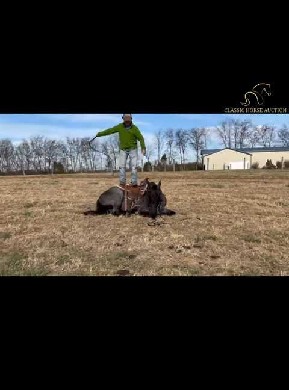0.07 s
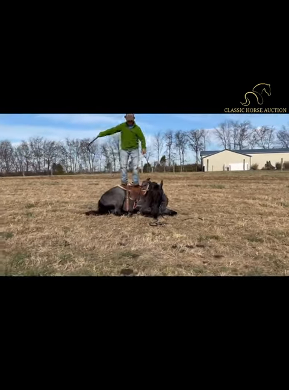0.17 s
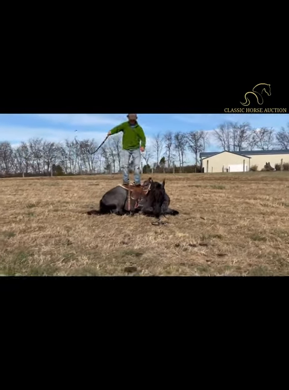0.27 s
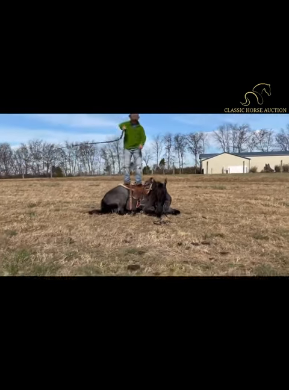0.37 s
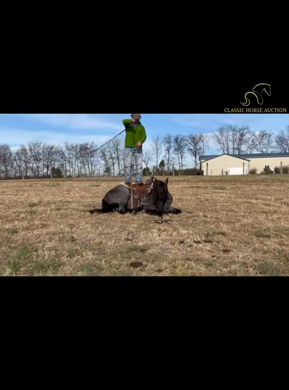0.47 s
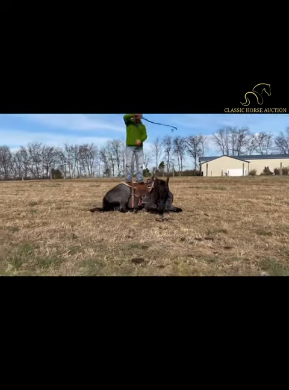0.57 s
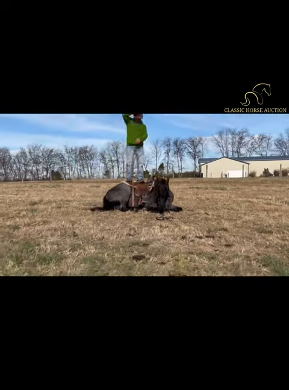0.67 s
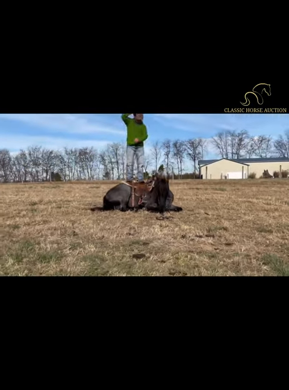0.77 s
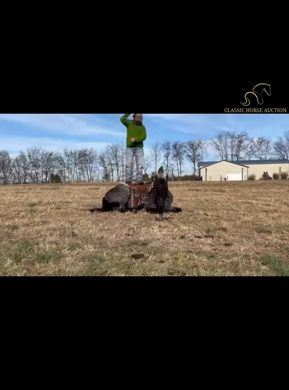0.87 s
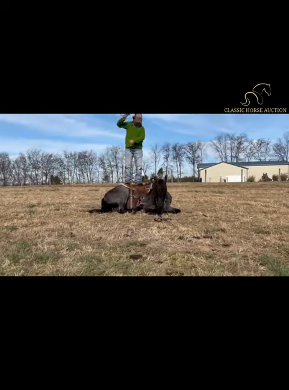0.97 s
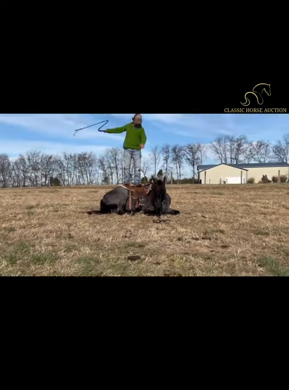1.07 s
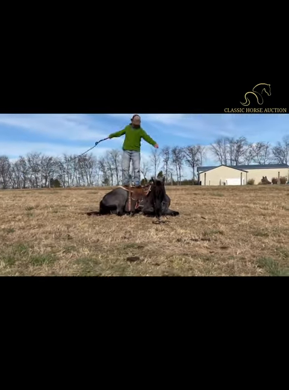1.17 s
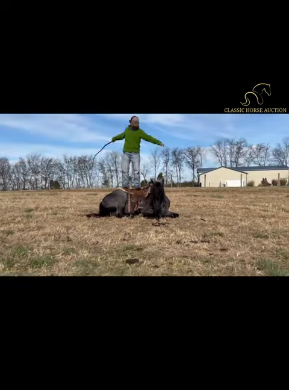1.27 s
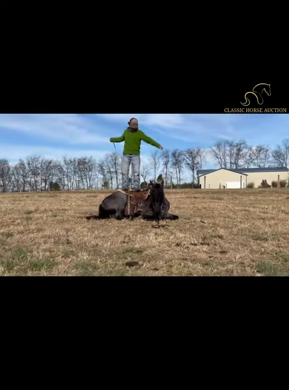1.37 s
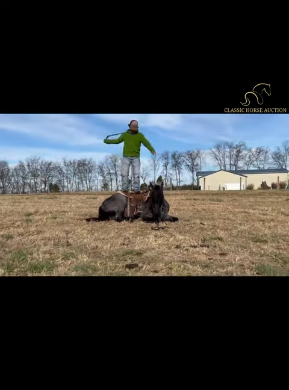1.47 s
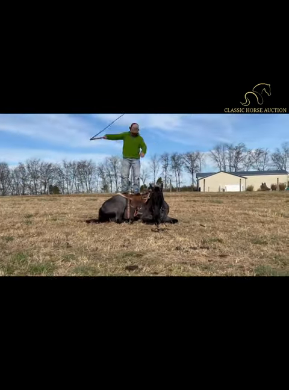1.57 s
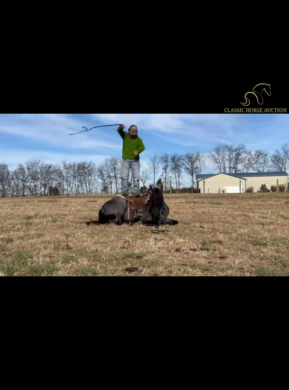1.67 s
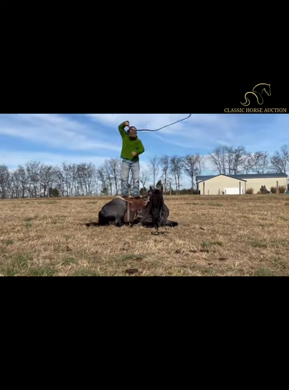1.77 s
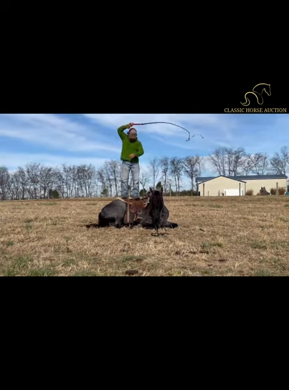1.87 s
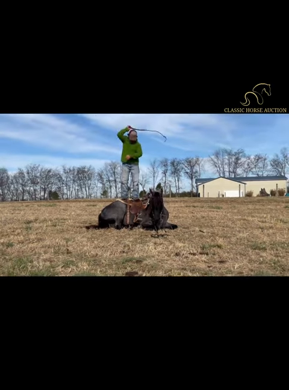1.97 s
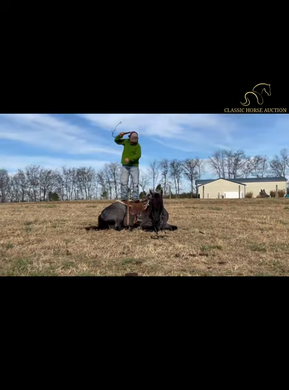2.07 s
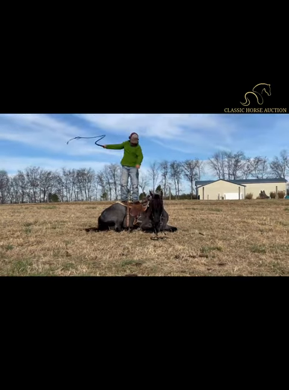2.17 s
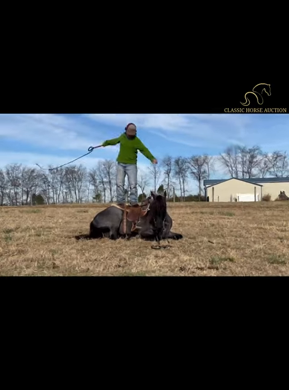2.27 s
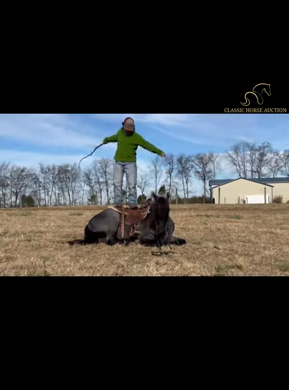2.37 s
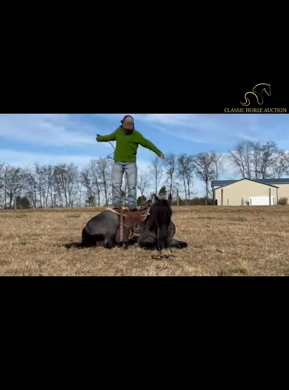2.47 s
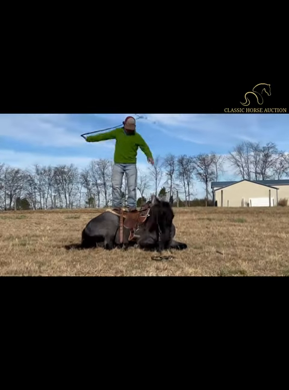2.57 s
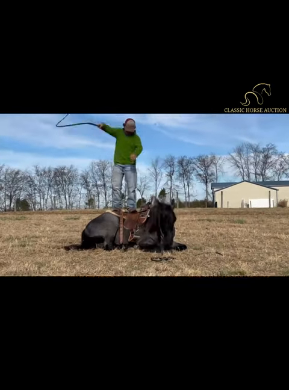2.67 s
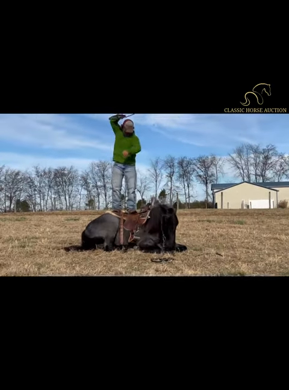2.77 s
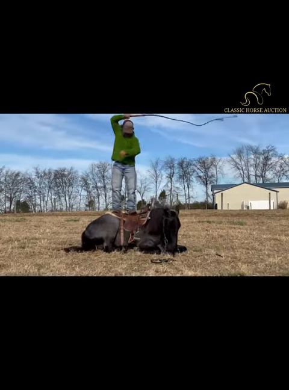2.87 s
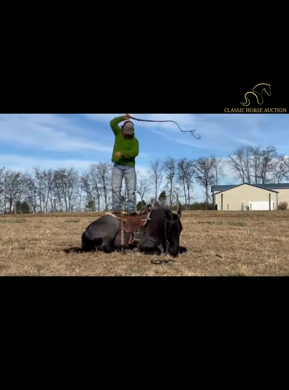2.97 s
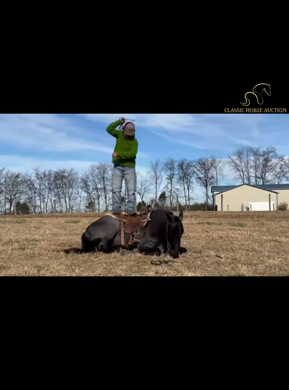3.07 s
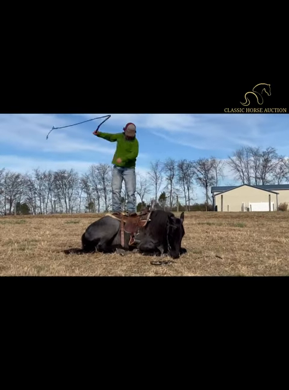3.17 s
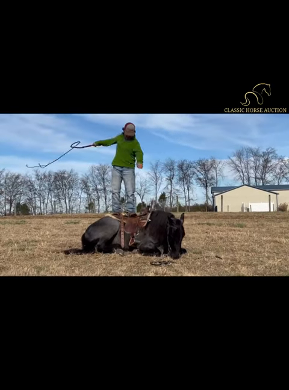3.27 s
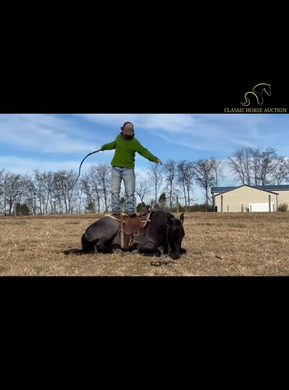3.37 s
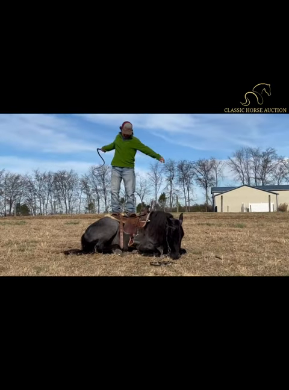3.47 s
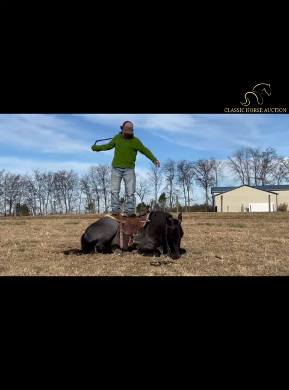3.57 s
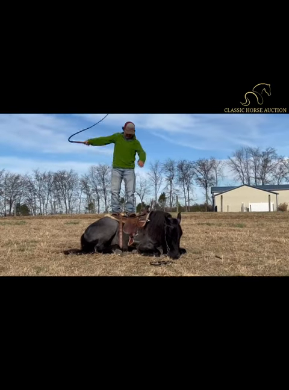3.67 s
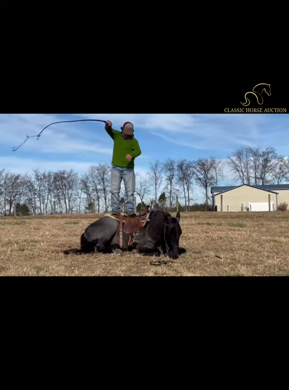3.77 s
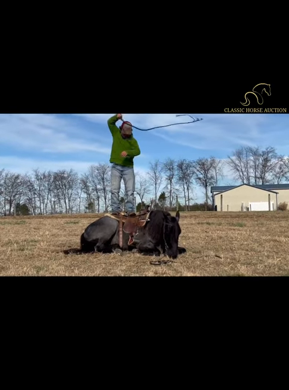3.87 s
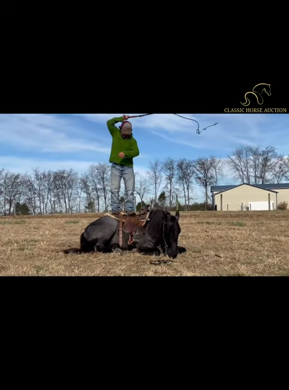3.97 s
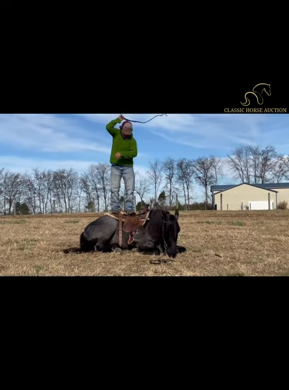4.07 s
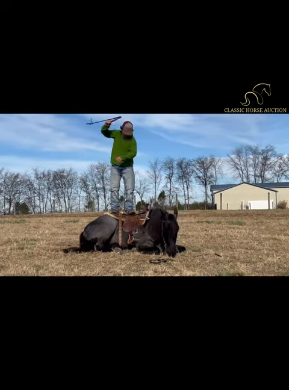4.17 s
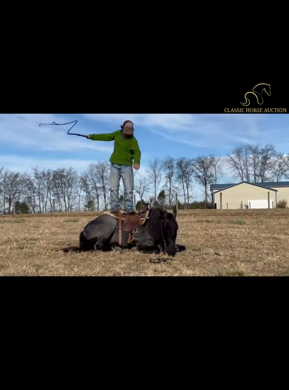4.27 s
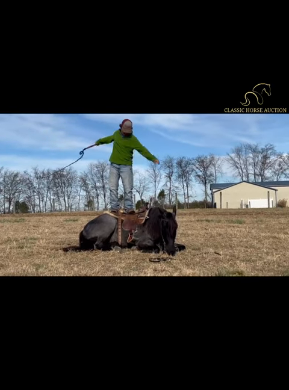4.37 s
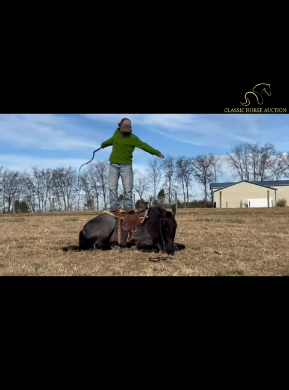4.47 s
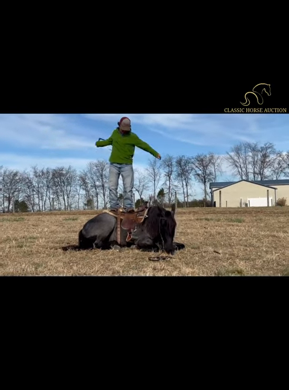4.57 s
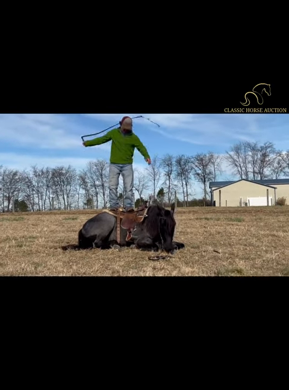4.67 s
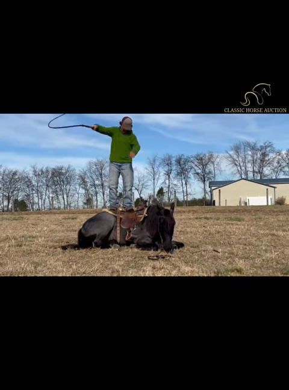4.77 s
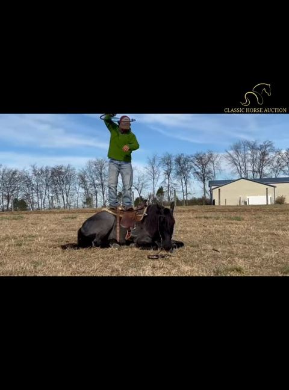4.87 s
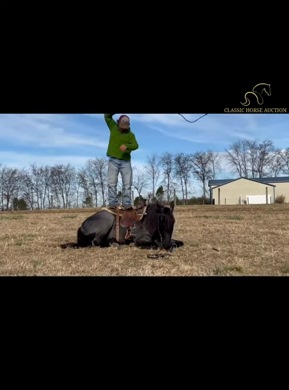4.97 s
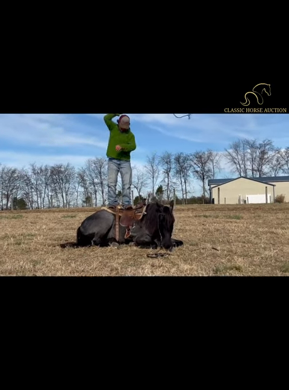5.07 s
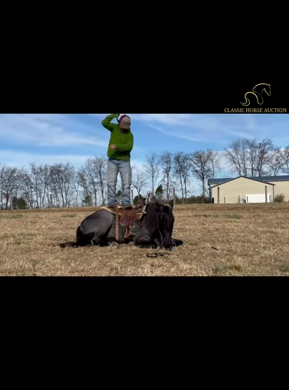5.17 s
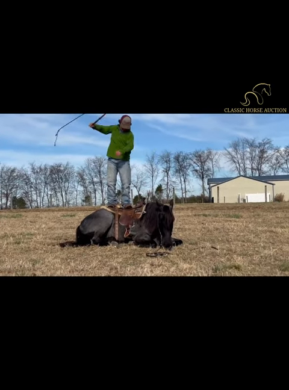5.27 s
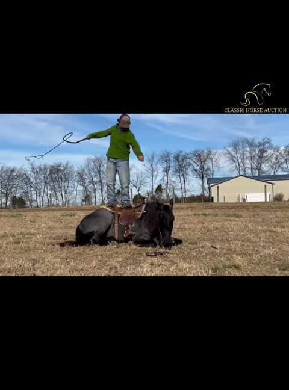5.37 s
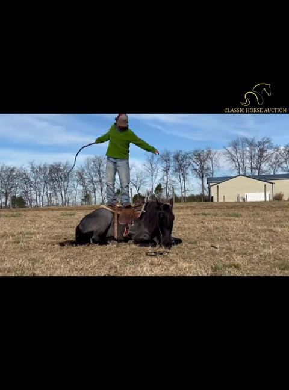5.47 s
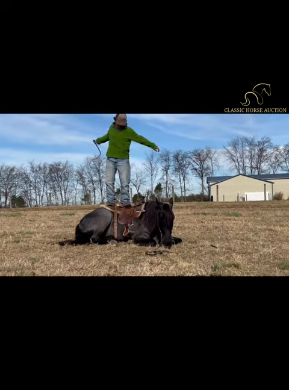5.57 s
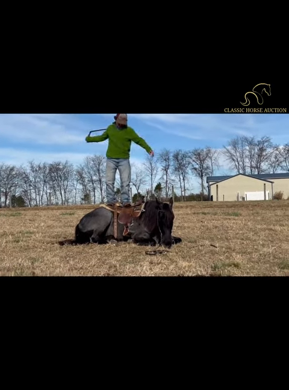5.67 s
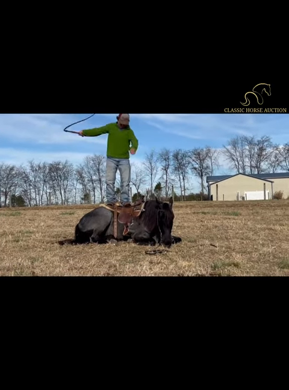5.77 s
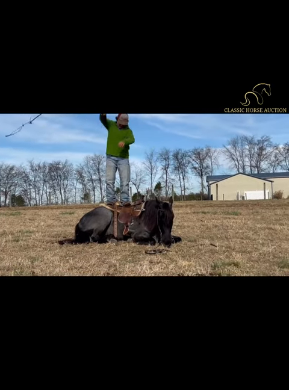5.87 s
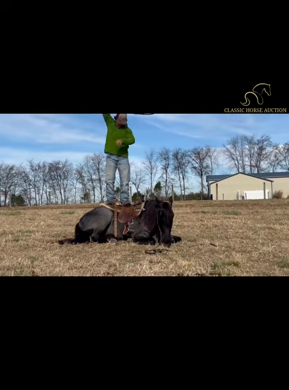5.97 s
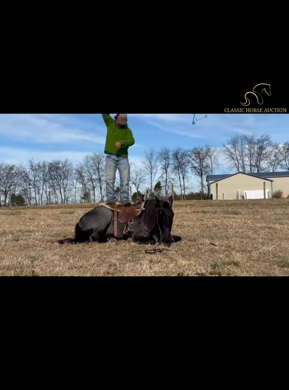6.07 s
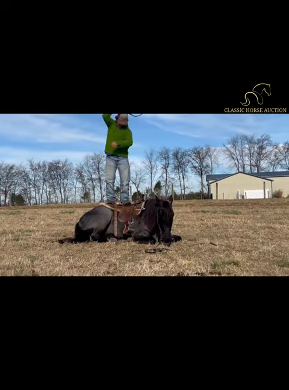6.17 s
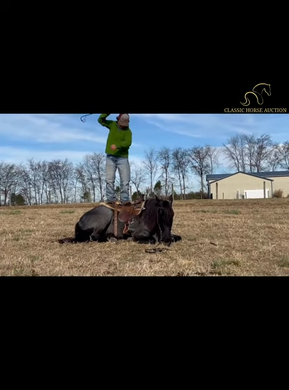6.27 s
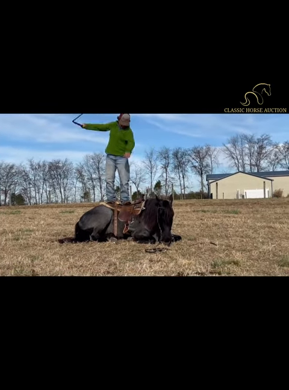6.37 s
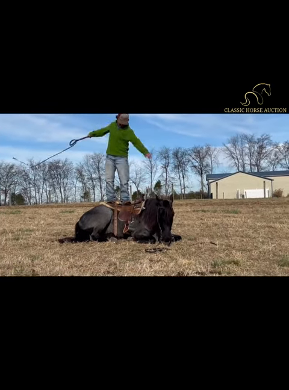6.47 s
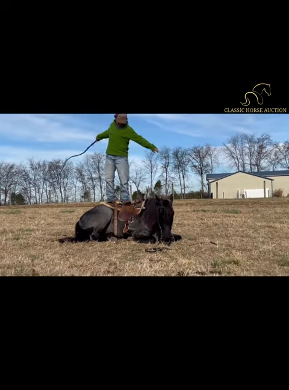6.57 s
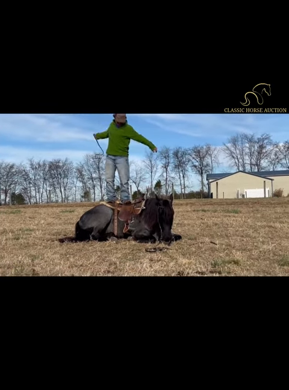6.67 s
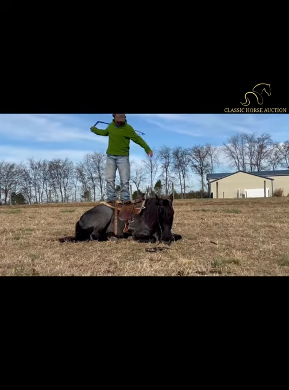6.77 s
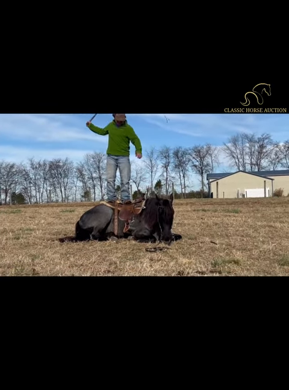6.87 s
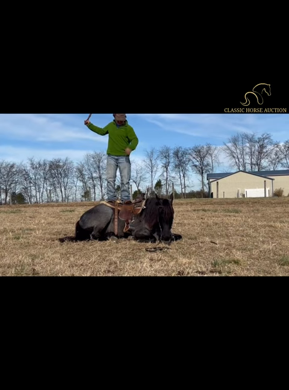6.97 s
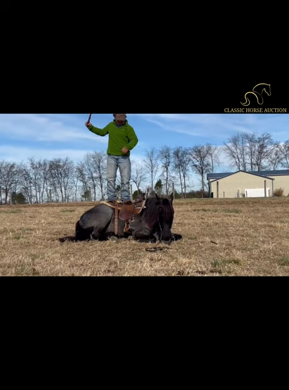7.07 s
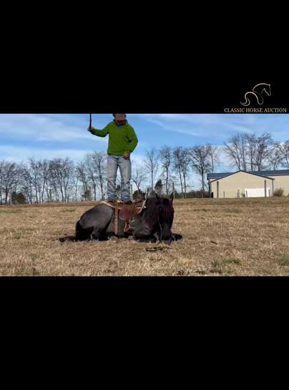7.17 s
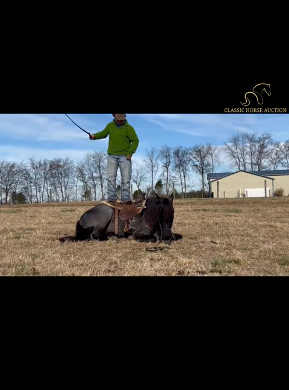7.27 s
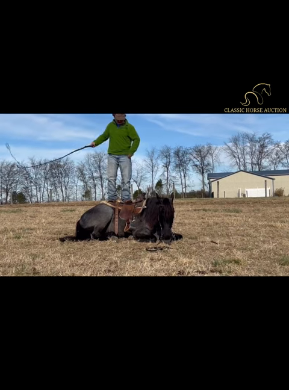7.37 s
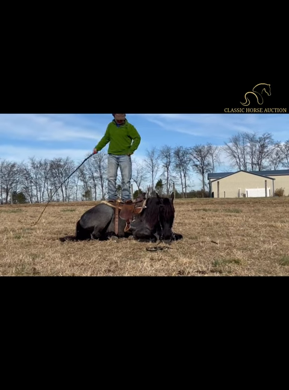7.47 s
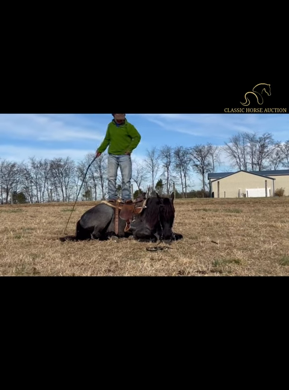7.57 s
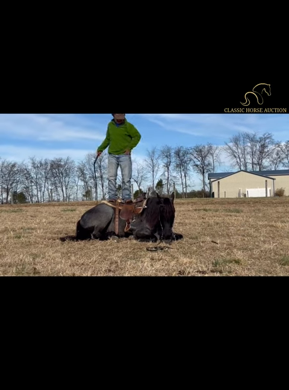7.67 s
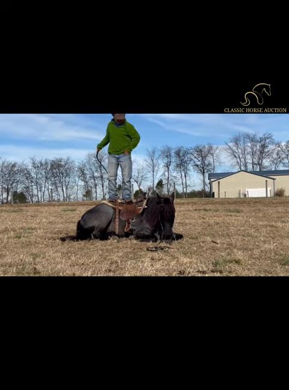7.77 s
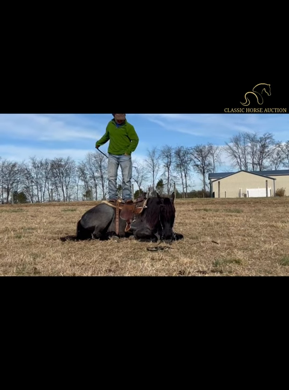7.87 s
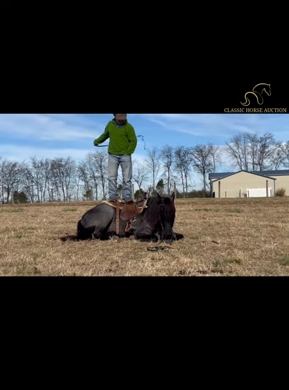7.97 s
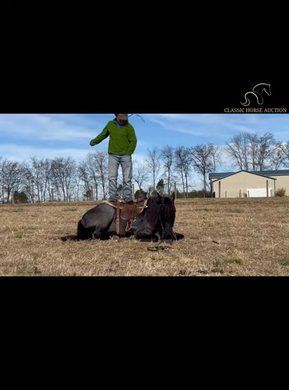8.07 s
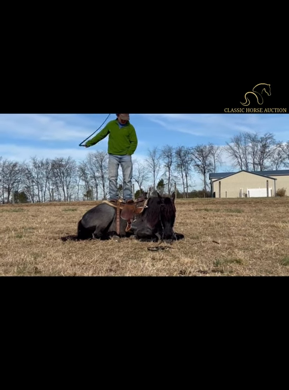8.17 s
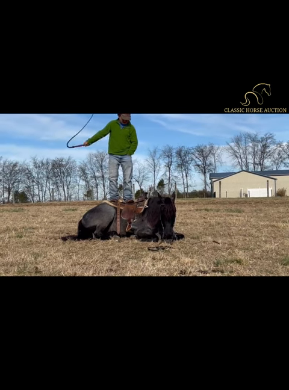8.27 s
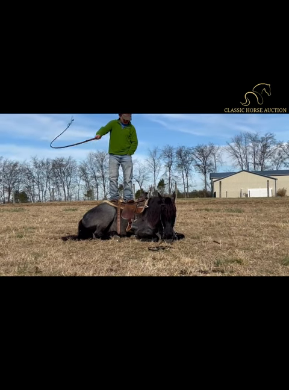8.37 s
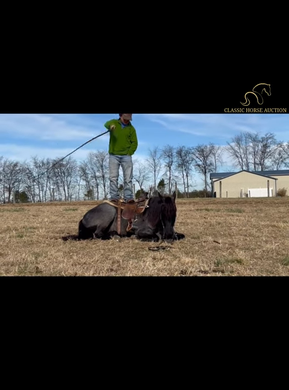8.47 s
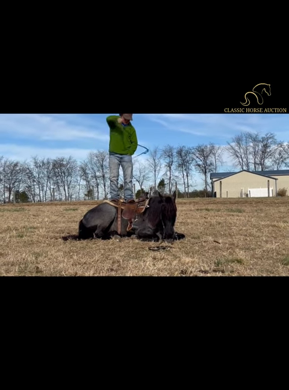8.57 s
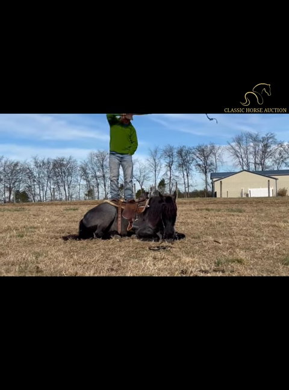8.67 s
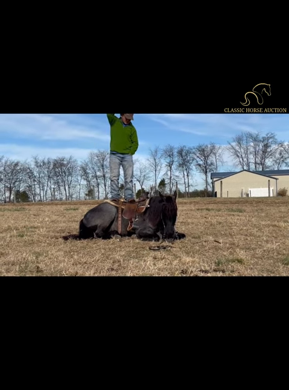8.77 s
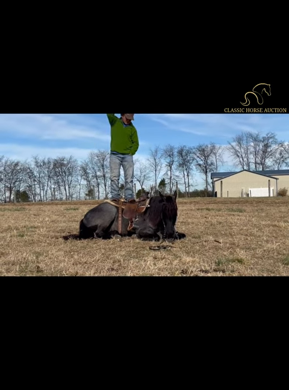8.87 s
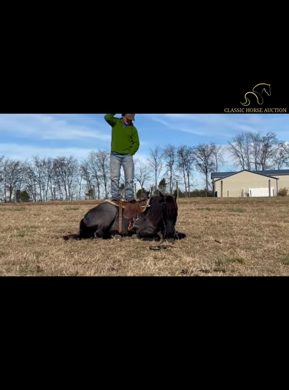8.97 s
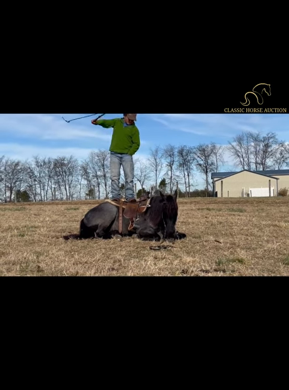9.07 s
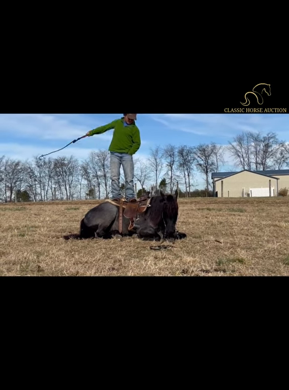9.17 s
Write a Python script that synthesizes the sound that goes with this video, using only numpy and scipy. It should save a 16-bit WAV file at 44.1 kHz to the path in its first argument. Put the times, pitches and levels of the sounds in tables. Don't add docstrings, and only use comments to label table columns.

```python
import sys
import numpy as np
from scipy import signal
from scipy.fft import rfft, irfft, next_fast_len
from scipy.io import wavfile

SR = 44100
rng = np.random.default_rng(int(sys.argv[2]) if len(sys.argv) > 2 else 0)


def boost(x):
    u = np.asarray(x, float) / 20
    return 10 ** u


def waveform_to_disk(signal):
    frames = np.transpose(np.atleast_2d(signal))
    scaled = np.clip(frames, -1, 1) * 32767
    samples = np.round(scaled).astype(np.int16)
    wavfile.write(sys.argv[1], SR, samples)


N = 406161


def rms_one(x):
    return x / np.sqrt(np.mean(x ** 2) + 1e-20)


def in_time(rows, size=N):
    s, *columns = np.transpose(rows)
    return [np.interp(np.arange(size) / SR, s, column) for column in columns]


def at_samples(law):
    coarse = np.arange(0, N + 16, 16)
    return np.interp(np.arange(N), coarse, law(coarse / SR))


def swells(rows):
    def law(t):
        total = 0
        for s, db, rise_s, fall_s in rows:
            away = np.where(t < s, (s - t) / rise_s, (t - s) / fall_s)
            total = total + boost(db - 20 * away)
        return total
    return at_samples(law)


def coloured(x, spectrum):
    hz, level_db = np.transpose(spectrum)
    size = 2 * next_fast_len(x.shape[-1] // 2 + 1)
    grid = np.fft.rfftfreq(size, 1 / SR) + 1
    gain = boost(np.interp(np.log(grid), np.log(hz), level_db))
    shaped = irfft(rfft(x, size) * gain, size)
    return rms_one(shaped[..., :x.shape[-1]])


def band(x, low_hz, high_hz, order=2):
    return signal.sosfilt(signal.butter(order, [low_hz, high_hz], "band", fs=SR, output="sos"), x)


def drift(rate):
    knots = rng.standard_normal(1000)
    return np.interp(np.arange(N) / SR * rate, np.arange(1000), knots) * 1.22


def stereo_noise(size, alike):
    mid, side = rng.standard_normal((2, size))
    alike = np.clip(alike, -1, 1)
    return np.sqrt((1 + alike) / 2) * mid + np.sqrt((1 - alike) / 2) * side * np.array([[1], [-1]])


def add(out, sound, s):
    i = round(s * SR)
    out[:, i:i + sound.shape[-1]] += sound[..., :N - i]


def pan(db):
    return boost(np.array([[db / 2], [-db / 2]]))


def burst(t, hz, decay_s):
    return (t >= 0) * np.exp(-np.maximum(t, 0) / decay_s) * np.cos(2 * np.pi * hz * t)


def ticks(rows, cycles, boost_db):
    out, t = np.zeros((2, N)), np.arange(400) / SR
    for s, peak_db, hz in rows:
        add(out, boost(peak_db + boost_db) * burst(t, hz, cycles / hz), s + .001)
    return band(out, 500, 13000, order=1)


# (time [s], murmur ahead [dB], ground scatter [dB], echo [dB], ground copy delay [ms])
FORWARD = [(1.166, -35.5, -45.5, -52.5, 1.73), (2.259, -40.5, -42.5, -53.5, 1.93),
           (3.291, -46.5, -44, -54.5, 2), (4.347, -45, -42.5, -59.5, 1.99), (5.399, -47, -42.5, -51, 1.95),
           (6.452, -52.5, -41, -53.5, 2.01)]
BACKWARD = [(1.711, -47.5, -43.5, -41.5, 1.63), (2.774, -48, -43.5, -52.5, 1.78),
            (3.824, -49, -40.5, -41, 1.8), (4.871, -49.5, -39.5, -42, 1.73),
            (5.922, -46.5, -39.5, -38, 1.77), (9.196, -42, -42.5, -53, 1.64)]
CRACKS = FORWARD + BACKWARD
# (time [s], snap [dB], low body [dB], thud [dB], extra edge [dB])
SHOCKS = [(1.1671, -1, -12, -21, 0), (1.1716, -4, -34, -35.5, 0), (1.7119, -9, -20, -24, -8),
          (1.7164, -.5, -12, -21.5, -12), (2.2588, -2, -8, -42, -3), (2.2647, -11, -18.5, -39, 0),
          (2.774, -28, -12.5, -19, 0), (2.7799, -10.5, -10.5, -15, 3), (3.292, 1.5, -19.5, -20.5, -2),
          (3.2989, -10, -22, -38, 0), (3.824, -13, -7, -11.5, 3), (3.8312, -7.5, -9.5, -24.5, 16.5),
          (4.3467, 0.5, -20.5, -21, -0.5), (4.3534, -13, -26, -38.5, 0), (4.8711, -19, -19, -17, 0.5),
          (4.8762, -3.5, -11, -13.5, 5), (5.3994, -1, -15, -22.5, 0), (5.4052, -20, -26.5, -43.5, 0),
          (5.9217, -12.5, -5.5, -11.5, 0), (5.9274, -6.5, -7.5, -15, 2.5), (6.4517, -0.5, -14.5, -23, -5),
          (6.4575, -10, -27, -33.5, 0), (9.194, -12.5, -35, -28.5, 12), (9.2017, -13, -14, -19.5, 3)]


def shocks():
    out, t = np.zeros((2, N)), np.arange(-176, 700) / SR
    chance = rng.standard_normal((len(SHOCKS), 2, 876))
    paths = sorted([(c[0], c[4], -2.5) for c in FORWARD] + [(c[0], c[4], 3.5) for c in BACKWARD])
    paths = np.repeat(paths, 2, axis=0)[:, 1:]

    def n_wave(late, width):
        return -(t - late) / width * np.exp(.5 - .5 * ((t - late) / width) ** 2)

    def onset(late, rise_s):
        return np.tanh(np.maximum(t - late, 0) / rise_s)

    def swing(late, hz):
        return -burst(t - late, hz, 0.0007) * onset(late, 8e-5)

    def front(late):
        return np.exp(-.5 * ((t - late) / 7e-5) ** 2)

    for (s, snap_db, body_db, thud_db, edge_db), (ground_ms, pan_db), noise in zip(SHOCKS, paths, chance):
        ground = ground_ms / 1000
        swing_hz = 846.5 + 40 * max(snap_db - body_db, 0)
        snap = n_wave(5e-5, 5.5e-5) + 1.5 * n_wave(2e-5, 2e-5)
        snap = snap + boost(0.83 * (body_db + 17) + edge_db) * n_wave(0, 1.1e-5)
        snap = snap + .22 * n_wave(ground, 7e-5)
        fizz = band(noise, 2500, 6000) * burst(t, 0, 0.0072)
        body = swing(8e-5, swing_hz) + .5 * front(0)
        body = body + 1.05 * swing(ground + 8e-5, swing_hz) + 0.3 * front(ground)
        body = body - 0.14 * (pan_db > 0) * burst(t - 2.5e-3, 150, 0.0098)
        thud = -burst(t - ground, 570, 0.0021) * onset(ground, 0.000067)
        sound = boost(snap_db - 5) * (snap + 0.056 * fizz) + boost(body_db - 1.5) * body * pan(pan_db)
        add(out, sound + boost(thud_db + 2.5) * thud, s - 176 / SR)
    return out


# (crack time [s], frequency [Hz], level [dB])
SMEARS = [(1.1668, 398, -45), (1.1667, 980, -33), (1.1651, 1626, -41), (1.1651, 2519, -48.5),
          (2.2578, 409, -46), (2.2589, 900, -31), (2.2569, 2552, -43.5), (3.292, 930, -57),
          (4.3467, 689, -38.5), (4.346, 6891, -45), (5.3993, 820, -37), (5.3973, 1518, -41.5),
          (5.9216, 732, -54.5), (9.2017, 5136, -45), (9.2017, 5300, -56), (9.2017, 6309, -52),
          (9.2017, 8419, -62.5)]
# (crack time [s], frequency [Hz], level [dB], lead [s])
STREAKS = [(1.166, 5200, -54, 0.019), (1.166, 7800, -54, 0.016), (1.164, 6400, -56, .007),
           (1.166, 1155, -27, 0.0072), (2.257, 7650, -54, 0.023), (2.252, 6100, -60, .017),
           (2.252, 3700, -58, .007), (5.398, 6900, -58.5, 0.024), (5.398, 1500, -56, 0.032),
           (5.399, 823, -31.5, 0.0069), (6.451, 7240, -46.5, .013), (6.451, 3850, -54, 0.014),
           (6.451, 800, -49.5, 0.01)]


def murmurs():
    swelling = tone_bunches([(*row, .021) for row in SMEARS], swell_db_per_s=1250, spread_hz=140)
    return swelling + tone_bunches(STREAKS, swell_db_per_s=250, spread_hz=150)


def tone_bunches(rows, swell_db_per_s, spread_hz):
    out, t = np.zeros((2, N)), np.arange(-1500, 88) / SR
    for (s, hz, level_db, lead_s), chance in zip(rows, rng.standard_normal((len(rows), 6, 4))):
        fade_in = np.clip(2.5 * (t + lead_s) / lead_s, 0, 1)
        fade_out = np.clip((.002 - t) / .002, 0, 1)
        bunch = 0
        for off, start, left, right in chance:
            phase = 3 * start + .8 * np.array([[left], [right]])
            bunch = bunch + np.sin(2 * np.pi * (hz + spread_hz * off) * t + phase)
        add(out, boost(level_db + 3.5) * boost(swell_db_per_s * t) * fade_in * fade_out * bunch, s - 1500 / SR)
    return out


# (time from the crack [s], level [dB], whistle [Hz])
FORE_STROKE = [
    (-.115, -87, 410.5),
    (-.07, -68, 509.6),
    (-.022, -66, 380),
]
BACK_STROKE = [
    (-.135, -82, 389.8),
    (-.04, -64, 373.1),
    (-.022, -62, 372),
]
FOLLOW_THROUGH = [
    (.04, -68, 480),
    (.09, -72, 410.1),
    (.125, -81, 405),
]


def strokes():
    shapes = [(c, FORE_STROKE) for c in FORWARD[1:]]
    shapes += [(c, shape) for c in BACKWARD for shape in (BACK_STROKE, FOLLOW_THROUGH)]
    curves = []
    for crack, shape in shapes:
        effort_db = 1.5 * (crack[2] + 41)
        curves.append([(crack[0] + s, db + effort_db, hz) for s, db, hz in shape])
    return sorted(curves)


def spans(curves):
    rows = []
    for curve in curves:
        first, last = curve[0], curve[-1]
        rows += [(first[0] - .015, -120, *first[2:]), *curve, (last[0] + .015, -120, *last[2:])]
    return in_time(rows)


def swish():
    level_db, hz = spans(strokes())
    phase = 2 * np.pi * np.cumsum(hz * (1 + 0.022 * drift(30))) / SR
    whistle = 1.2 * np.sin(phase) * (1 + 0.69 * drift(30))
    noise = rms_one(band(stereo_noise(N, .8), 300, 600))
    return boost(level_db - .5) * (whistle + .45 * noise)


# (frequency [Hz], level [dB per Hz])
SCATTER = [(150, -27.5), (330, 1), (1000, -8), (1450, -7), (5100, -13), (6870, -10.5), (8780, -12),
           (16500, -17)]


def scatter(cracks, onset_s, quick, quick_s, slow_s):
    out, t = np.zeros((2, N)), np.arange(int(.3 * SR)) / SR
    cut = signal.butter(12, 15900, fs=SR, output="sos")
    lead = t[:880]
    for s, murmur_db, scatter_db, echo_db, ground_ms in cracks:
        tail = boost(-60 * t / slow_s) + quick * boost(-60 * t / quick_s)
        tail = tail * np.tanh((t / onset_s) ** 2)
        clumps = boost(2.5 * np.interp(t * 250, np.arange(80), rng.standard_normal(80)))
        hiss = signal.sosfilt(cut, coloured(stereo_noise(len(t), 0.98), SCATTER))
        add(out, boost(scatter_db) * tail * clumps * hiss, s)
        murmur = band(stereo_noise(880, .1), 550, 3200) * np.sin(np.pi / 2 * lead / lead[-1]) ** 3.2
        add(out, boost(murmur_db + 2.5) * murmur, s - .02)
    return out


# (delay after the crack [s], level [dB], share of single reflections [0-1])
FAR_ECHO = [(.15, -54, .8), (.166, -19.5, 1), (.21, -12, .8), (.25, -1.5, .3), (.3, -23.5, .5),
            (.334, -18, .6), (.355, -4.5, .3), (.38, -21, .3), (.6, -34, .2)]
NEAR_ECHO = [(.048, -25.5, .5), (0.052, -0.5, .5), (0.058, -1, .3), (.085, -28, .1), (0.121, -39.5, .1),
             (0.172, -38, .7), (.21, -35.5, .7), (0.258, -40, .3), (.4, -58, .2)]
# (frequency [Hz], level [dB per Hz])
ECHO = [(530, -30), (1500, -2), (3340, -2), (7130, -13), (8760, -16.5), (9770, -33), (12000, -41),
        (15600, -71.5)]


def echoes(cracks, swell, per_s, twig_db):
    out, size = np.zeros((2, N)), int(swell[-1][0] * SR) // 2 * 2
    level_db, single = in_time(swell, size=size)
    single = np.clip(single, 0, 1)
    clicks = (rng.random(size) < per_s / SR) * boost(2.5 * rng.standard_normal(size))
    twigs = rms_one(clicks) * pan(1.5) * boost(twig_db)
    started = np.arange(size) > swell[0][0] * SR
    for s, murmur_db, scatter_db, echo_db, ground_ms in cracks:
        mixed = np.sqrt(single) * twigs + np.sqrt(1 - single) * stereo_noise(size, 0.13)
        swollen = boost(level_db) * started * band(coloured(mixed, ECHO), 1700, 19000, order=1)
        add(out, boost(echo_db) * swollen, s)
    return out


# (time [s], peak level [dB], centre frequency [Hz])
POSTS_EARLY = [
    [(1.3268, -58, 2760), (1.3497, -58, 1800), (1.3542, -49, 2090), (1.3717, -56, 2240),
     (1.3717, -44, 2600), (1.3827, -41, 2760), (1.4056, -45, 2030), (1.4216, -44, 3660),
     (1.4804, -55, 2560), (1.4979, -52, 2860), (1.5129, -55, 3850), (1.5129, -42, 2100)],
    [(2.4028, -70, 1970), (2.4183, -70, 1800), (2.4183, -52, 2030), (2.4467, -62, 1800),
     (2.4467, -50, 2340), (2.4642, -61, 1800), (2.4642, -59, 1800), (2.4642, -45, 2430),
     (2.4752, -41, 3250), (2.4926, -49, 2570), (2.4981, -49, 3260), (2.5555, -59, 2520), (2.561, -60, 2420),
     (2.5715, -55, 2220), (2.5844, -53, 1840), (2.6039, -53, 3070), (2.6039, -40, 2600)],
    [(3.4518, -65, 1990), (3.4743, -54, 2490), (3.4823, -54, 2550), (3.4823, -52, 2220),
     (3.4917, -48, 3840), (3.4982, -45, 3870), (3.5092, -45, 3500), (3.5267, -51, 2940),
     (3.5331, -48, 2540), (3.6045, -58, 2310), (3.6115, -58, 1830), (3.6219, -57, 3590),
     (3.6369, -63, 1800), (3.6369, -47, 2600)],
]
POSTS_LATE = [
    [(4.5063, -57, 2000), (4.5362, -73, 1800), (4.5362, -59, 2290), (4.5442, -58, 1830),
     (4.5537, -55, 1940), (4.5647, -54, 2060), (4.5881, -63, 2940), (4.5881, -55, 2500),
     (4.6031, -54, 2340), (4.6455, -60, 2940), (4.6665, -57, 1835), (4.6919, -58, 1800),
     (4.6919, -51, 2170)],
    [(5.5593, -64, 1800), (5.5593, -53, 1830), (5.5823, -50, 1800), (5.5902, -45, 1800),
     (5.5997, -45, 5600), (5.6052, -46, 4490), (5.6102, -42, 4450), (5.6162, -43, 3350),
     (5.6346, -48, 2520), (5.6396, -46, 3710), (5.6546, -41, 3700), (5.7125, -51, 2330),
     (5.7179, -53, 2690), (5.7299, -50, 2010), (5.7444, -54, 1800), (5.7444, -41, 2080),
     (5.7504, -44, 2050)],
    [(6.6148, -61, 1970), (6.6343, -60, 1800), (6.6348, -57, 2480), (6.6398, -51, 2200),
     (6.6477, -55, 3710), (6.6477, -48, 2230), (6.6567, -46, 2220), (6.6872, -50, 2230),
     (6.6911, -45, 2420), (6.7645, -51, 3810), (6.77, -51, 1920), (6.7964, -54, 1800), (6.7964, -46, 2070),
     (6.8333, -63, 2080), (6.8737, -64, 2730), (6.8797, -64, 2740), (6.9101, -73, 1800)],
]


def posts():
    clicks = ticks(sum(POSTS_EARLY + POSTS_LATE, []), cycles=0.79, boost_db=2.5)
    return band(clicks * pan(0.76), 1200, 8500)


# (time [s], peak level [dB], centre frequency [Hz])
SLAPS = [(1.513, -46.5, 2100), (1.765, -51, 1840), (1.889, -47.5, 3330), (1.942, -39.5, 1268),
         (2.049, -53, 515), (2.339, -57, 635), (2.828, -49, 532), (2.996, -43, 499), (3.654, -54.5, 607),
         (3.723, -34.5, 1033), (3.873, -26.5, 1840), (4.052, -54, 628), (4.693, -47.5, 511),
         (4.924, -30, 1880), (5.97, -28.5, 1850), (6.145, -47.5, 1090), (6.796, -46, 2090),
         (3.782, -62, 2200), (3.789, -63, 2000), (3.796, -63, 2300), (3.9558, -56, 2220),
         (3.9792, -56, 1900), (3.9947, -57, 2100), (4.008, -60, 2300), (4.023, -59, 2400),
         (6.0942, -58, 2110), (6.112, -61, 4500)]


def slaps():
    return ticks(SLAPS, cycles=0.81, boost_db=2.0)


# (time [s], peak level [dB], centre frequency [Hz])
SNAPS = [(0.2274, -52.5, 6390), (0.2623, -41, 7350), (0.322, -45, 8660), (0.403, -45.5, 2520),
         (0.4561, -40.5, 3620), (0.5671, -41.5, 8400), (0.5875, -54, 3660), (0.6314, -71, 3240),
         (1.0725, -59, 8540), (4.138, -62, 7000), (4.229, -62, 2870), (4.289, -56, 3160),
         (7.5764, -49.5, 6900), (8.9844, -71, 3220)]


def stalk_snaps():
    return ticks(SNAPS, cycles=0.21, boost_db=4.5)


# (time [s], peak level [dB])
CREAKS = [(6.9542, -56.5), (7.0824, -60), (7.1009, -60), (7.13, -56.5), (7.1528, -58), (7.1762, -56.5),
          (7.2106, -57), (7.2916, -57), (7.47, -62), (7.5079, -59), (7.5387, -59.5), (7.5583, -62),
          (7.589, -59), (7.6212, -61), (7.8352, -64), (7.9724, -60), (7.70, -63.5), (8.959, -63),
          (9.0024, -66)]
# (frequency [Hz], level [dB], decay [s])
LEATHER = [(1960, 3.5, 0.00052), (1440, -15.5, 0.00081), (2780, -20, 0.00095)]


def creaks():
    out, t = np.zeros((2, N)), np.arange(400) / SR
    rattle = [(9.0565 + .004 * k + .00055 * k * k, -63 + .3 * k) for k in range(10)]
    slips = CREAKS + rattle
    for (s, peak_db), jitter in zip(slips, rng.standard_normal((len(slips), 400))):
        slip = 0
        for (hz, level_db, decay_s), chance in zip(LEATHER, jitter):
            slip = slip + boost(level_db + 2.15 * chance) * burst(t, hz, decay_s)
        scuff = 0.5 * jitter * burst(t, 0, 0.0031)
        add(out, boost(peak_db) * (slip + scuff) * pan(-1.63), s)
    return 1.15 * band(out, 1100, 3300, order=3)


# (time [s], level [dB], rise [s], fall [s])
RUSTLE = [(.36, -73, .7, 0.48), (.972, -73.5, 0.15, 0.34), (3.006, -82.5, .1, 0.86),
          (7.63, -78.5, .12, 0.13), (9.185, -66.5, .045, .05)]
# (frequency [Hz], level [dB per Hz])
GRASS = [(350, -36.5), (600, -3.5), (1580, -4.5), (3210, -14), (8360, -6.5), (11300, -7), (15800, -9),
         (16800, -21.5)]


def rustle():
    lashes = [(c[0] - .003, -73, 0.037, .004) for c in CRACKS]
    level = swells(RUSTLE + lashes)
    sizes = boost(3.1 * np.minimum(rng.exponential(1, N), 5))
    snaps = (rng.random(N) < 900 / SR) * sizes * rng.choice([-1, 1], N)
    return level * boost(7.5) * coloured(stereo_noise(N, 0.85) + .5 * rms_one(snaps), GRASS)


def brush():
    out, t = np.zeros((2, N)), np.arange(int(.25 * SR)) / SR
    sweep = band(stereo_noise(len(t), 0.78), 500, 4250, order=1)
    add(out, boost(-56.5) * sweep * np.tanh(t / 0.013) * boost(-60 * t / 0.27), 8.487)
    return out


# (time [s], level [dB])
GUST = [(0.0, -64), (1.71, -49), (2.1, -57), (2.46, -52), (2.94, -60), (3.38, -54), (3.76, -57),
        (5.02, -53), (5.28, -57), (5.61, -51), (5.87, -55), (7.46, -59), (7.74, -64), (9.2, -60)]


def gust_db():
    db = in_time(GUST)[0]
    return db - db.mean()


# (time [s], level [dB], reach [Hz])
BUFFETS = [(.39, -50, 326), (.53, -63.5, 400), (1.39, -54, 299.8), (5.752, -52.5, 450), (6.248, -52, 300),
           (1.66, -58, 330), (8.52, -66, 480)]
# (time [s], level [dB], frequency [Hz], decay [s])
SHOVES = [
    (1.181, -36, 62, 0.021),
    (2.2688, -21, 70, .02),
    (5.4042, -23, 68, .035),
]


def buffets():
    out, t = np.zeros((2, N)), np.arange(-11025, 11025) / SR
    for s, db, hz in BUFFETS:
        swell = boost(db - 20 * np.where(t < 0, -t / 0.089, t / .06))
        add(out, swell * rms_one(band(stereo_noise(len(t), .6), 77, hz)), s - .25)
    for s, db, hz, decay_s in SHOVES:
        swing = np.sin(2 * np.pi * hz * t + np.array([[.4], [-.4]]))
        add(out, boost(db) * burst(t, 0, decay_s) * np.tanh(t / .003) * swing, s - .25)
    return out


# (frequency [Hz], level [dB per Hz])
RUMBLE = [(12, -50), (20, -21), (45, -4.5), (65, 3.5), (116, -3), (134, -10.5), (216, -23.5), (390, -66.5)]
# (time [s], level [dB], fall [s])
PUFFS = [(1.2, -44, 0.054), (1.41, -43, .1), (1.85, -47, .15), (2.3, -45, .05), (2.65, -48, 0.19),
         (3.31, -46, 0.18), (4.87, -44, .1), (5.47, -43, 0.075), (5.53, -41, 0.1), (6.13, -45, 0.29),
         (6.25, -45.5, 0.093)]
# (frequency [Hz], rms level [dB])
HUM = [(110, -68), (150, -74.5), (220, -83)]


def wind():
    noise = coloured(stereo_noise(N, 0.68), RUMBLE)
    puffs = swells([(s, db, 0.027, fall_s) for s, db, fall_s in PUFFS])
    low_level = boost(-57 + gust_db() + 3.3 * drift(9)) + puffs
    low = rms_one(band(noise, 30, 80, order=3)) * low_level
    upper_level = boost(-61.5 + 1.1 * gust_db() + 3.5 * drift(13))
    upper = rms_one(band(noise, 90, 230, order=3)) * upper_level
    t = np.arange(N) / SR
    hum = sum(boost(db + 1.5 + 3.1 * drift(5)) * np.sin(2 * np.pi * hz * t) for hz, db in HUM)
    return low + upper + buffets() + hum * pan(1.2)


# (frequency [Hz], level [dB per Hz])
FIELD = [(120, -27.5), (200, -3.5), (290, -12.5), (930, -17), (1500, -22), (3160, -31.5), (6000, -39.5),
         (7800, -70)]
# (time [s], level over the hiss [dB], rise [s], fall [s])
STIRS = [
    (7.08, 3, .45, .5),
    (8.0, -2, .4, 0.48),
    (8.86, -3, 0.29, 0.29),
]


def air():
    hiss = coloured(stereo_noise(N, 0.79), FIELD)

    def crack_return(t):
        return sum((t > c[0]) * boost(8.5 - 30 * (t - c[0])) for c in CRACKS)

    rush = swells([(c[0], 12, 0.12, .01) for c in CRACKS[:-1]])
    lower = band(hiss, 30, 900, order=1)
    calm = boost(-4.5)
    upper = (hiss - lower) * (calm + at_samples(crack_return) + rush) * boost(3.3 * drift(7))
    stirs = band(hiss, 1250, 4200, order=3) * swells(STIRS) * boost(1.0 + 3.0 * drift(10))
    patches = .35 * drift(6) + swells([(8.0, -1.1, .5, 0.44)])
    lower = lower + patches * band(hiss, 550, 1000)
    return boost(-76 + .5 * gust_db() + 1.9 * drift(9)) * (lower + upper + stirs)


def ducking():
    def dip_db(t):
        total = 0
        for crack in CRACKS:
            late = np.maximum(t - crack[0], 0) / 0.051
            total = total - 19 * late * np.exp(-late)
        return total
    return boost(at_samples(dip_db))


def scene():
    ground = scatter(FORWARD, onset_s=0.0075, quick=1.2, quick_s=.06, slow_s=0.2)
    ground = ground + scatter(BACKWARD, onset_s=.003, quick=4.5, quick_s=0.036, slow_s=.17)
    whip = shocks() + murmurs() + swish() + ground
    far = echoes(FORWARD, FAR_ECHO, per_s=1300, twig_db=-2.5)
    near = echoes(BACKWARD, NEAR_ECHO, per_s=400, twig_db=-5)
    returns = far + near + posts() + slaps()
    small = stalk_snaps() + creaks() + rustle() + brush()
    return whip + returns + small + wind() + air() * ducking()


def band_limit(x):
    return signal.sosfilt(signal.butter(12, 17660, fs=SR, output="sos"), x)


# (frequency [Hz], width [Hz], level [dB])
NOTCHES = [(10070, 250, -6), (13750, 250, -9)]


def record(dry):
    size = 2 * next_fast_len(N // 2 + 1)
    hz = np.fft.rfftfreq(size, 1 / SR)
    early_s = 6.5e-4 * np.clip((hz - 4500) / 4000, 0, 1)
    apart = .42 * np.clip(hz / 900, 0, 1) - 2 * np.pi * 2.7e-4 * np.maximum(hz - 8000, 0)
    turn = 2 * np.pi * np.cumsum(early_s) * hz[1] + np.array([[.5], [-.5]]) * apart
    notch_db = sum(db / (1 + ((hz - at_hz) / width_hz) ** 4) for at_hz, width_hz, db in NOTCHES)
    top_db = -4.5 * np.clip((hz - 9500) / 1500, 0, 1)
    ports = irfft(rfft(dry, size) * np.exp(1j * turn) * boost(.6 + notch_db + top_db))[:, :N]
    overloaded = 1.3 * np.tanh(ports / 1.3)
    cut = signal.sosfiltfilt(signal.cheby2(10, 50, 17250, fs=SR, output="sos"), overloaded)
    return band_limit(cut)


dry = scene()
out = record(dry)
waveform_to_disk(out)
```